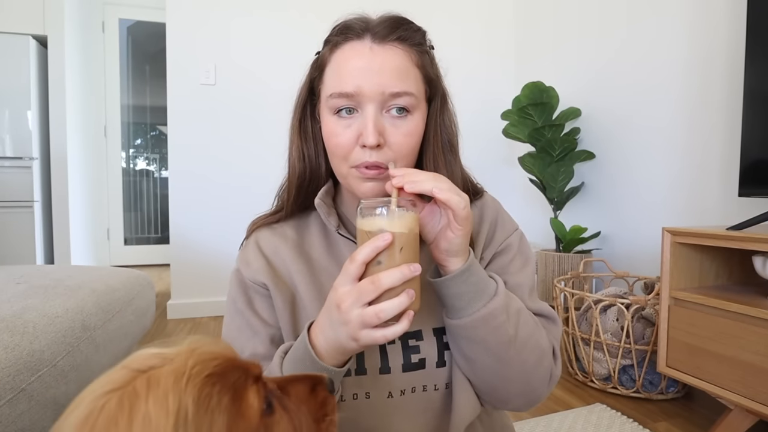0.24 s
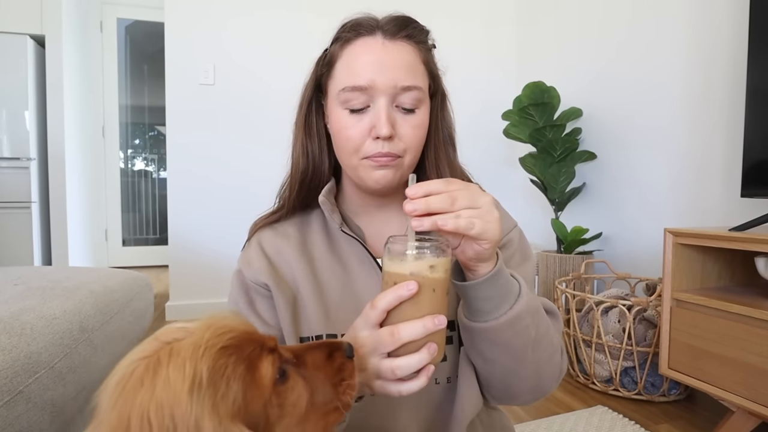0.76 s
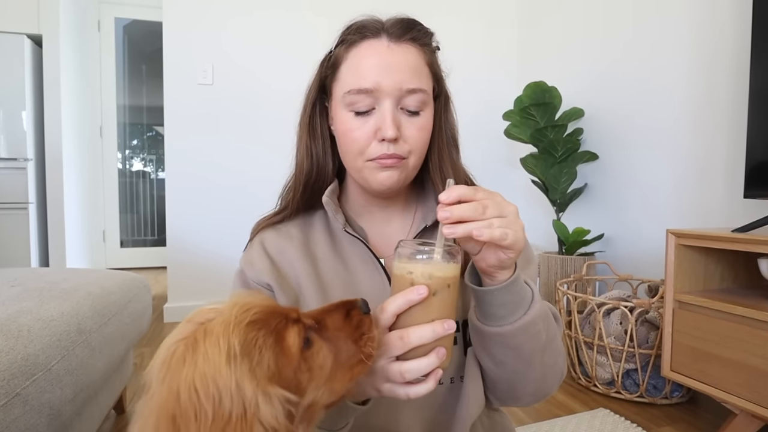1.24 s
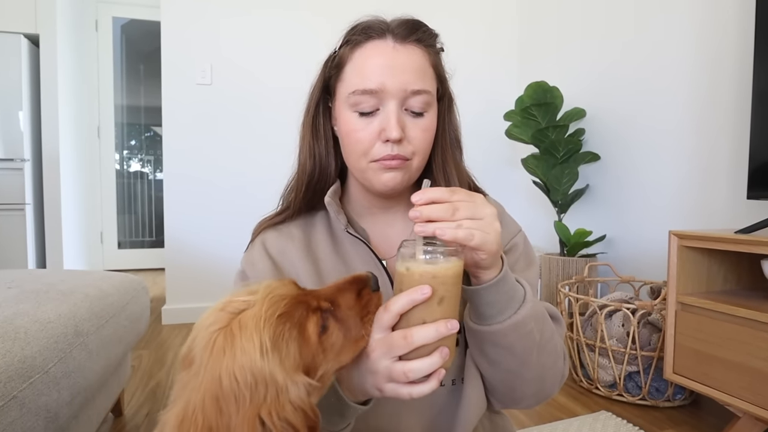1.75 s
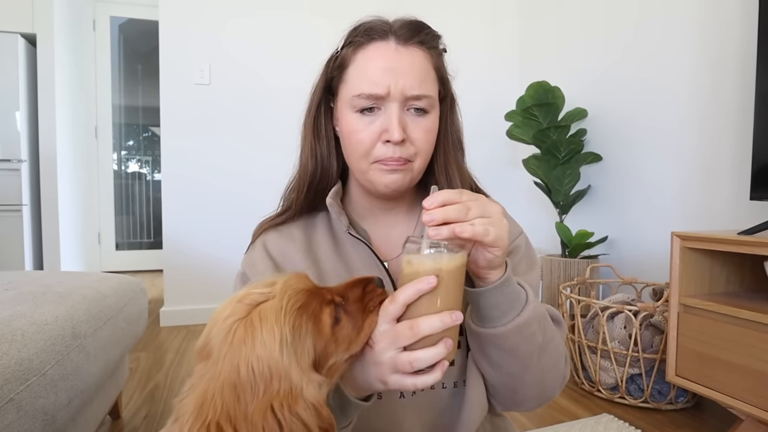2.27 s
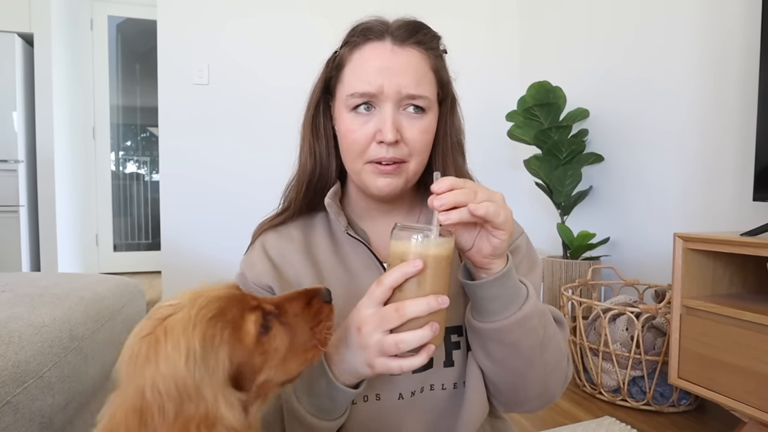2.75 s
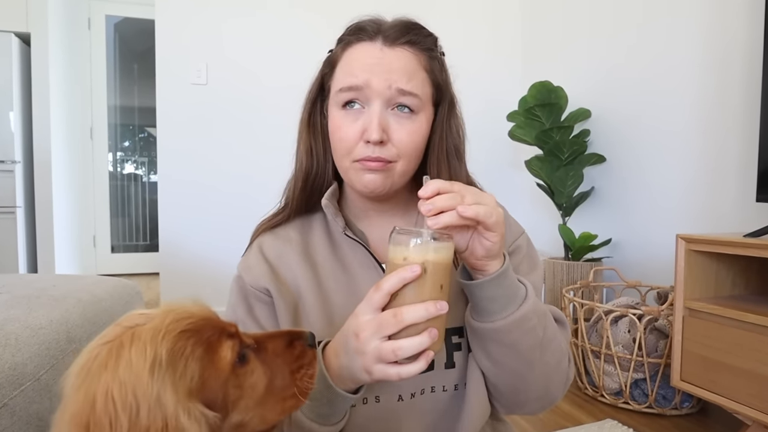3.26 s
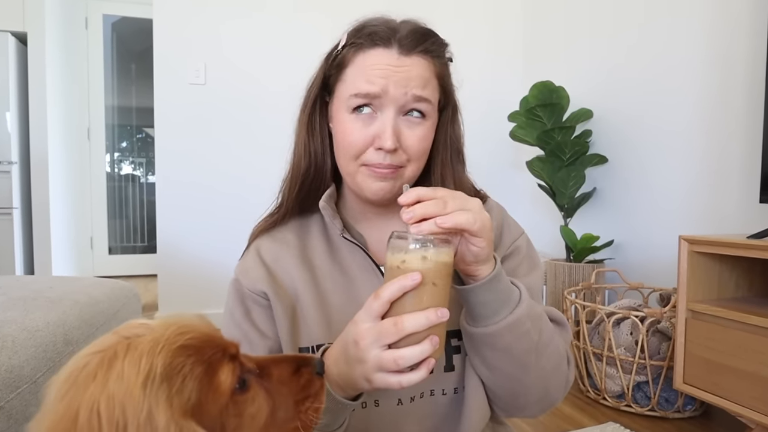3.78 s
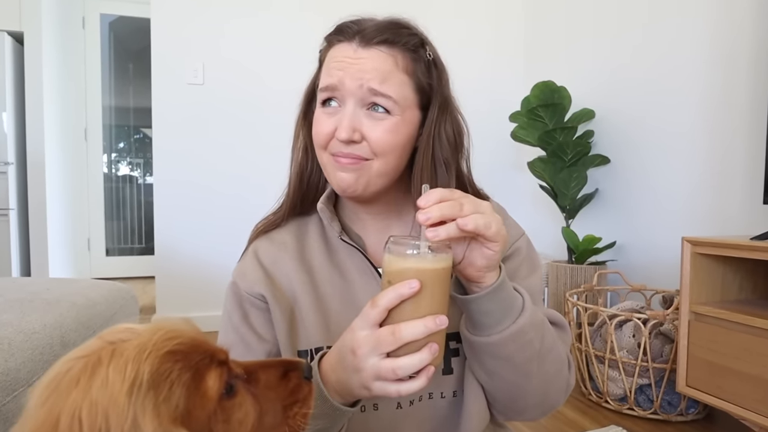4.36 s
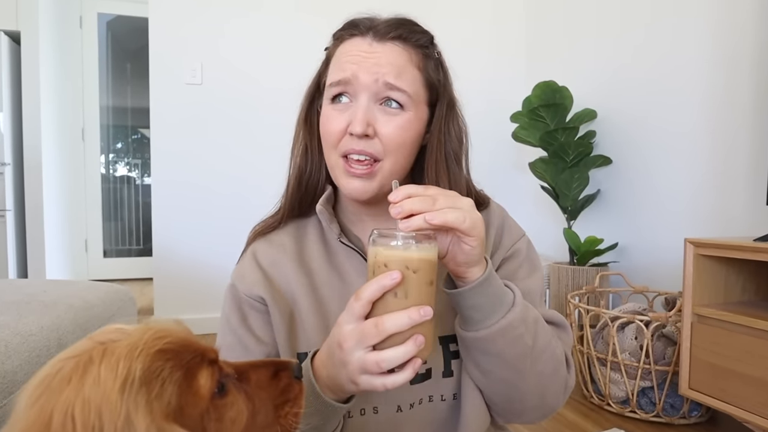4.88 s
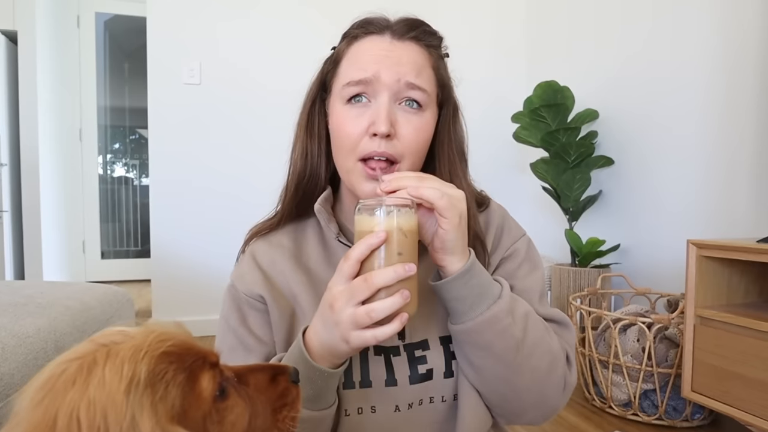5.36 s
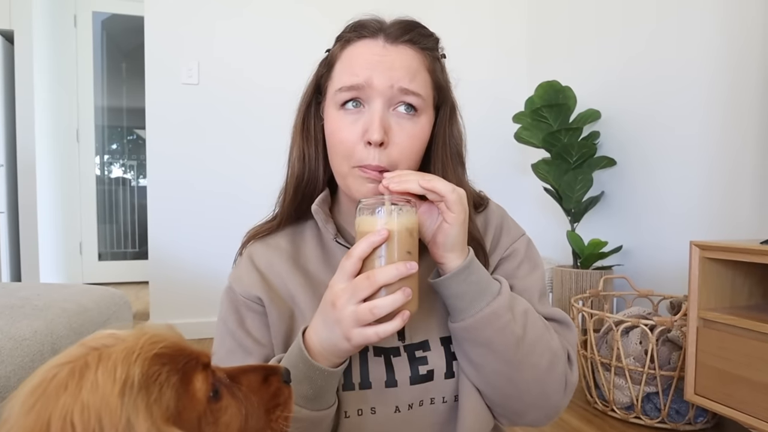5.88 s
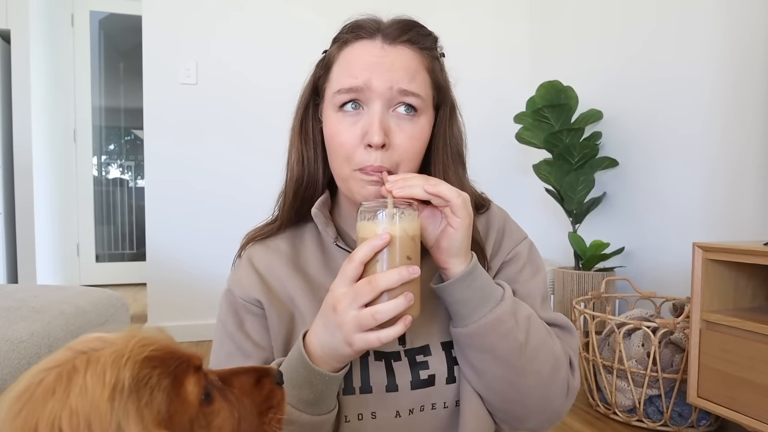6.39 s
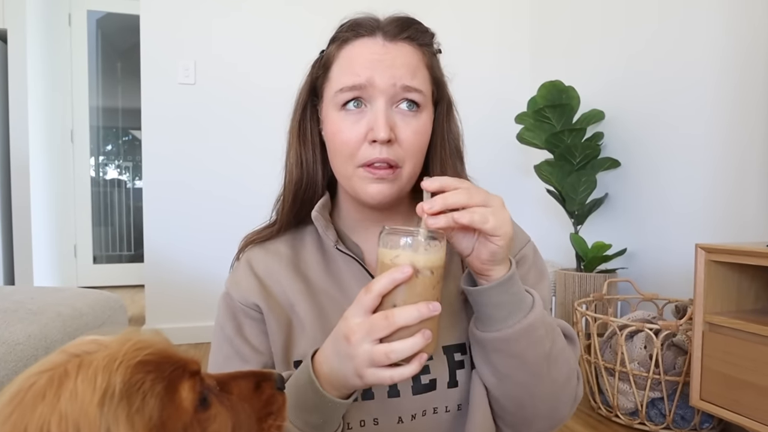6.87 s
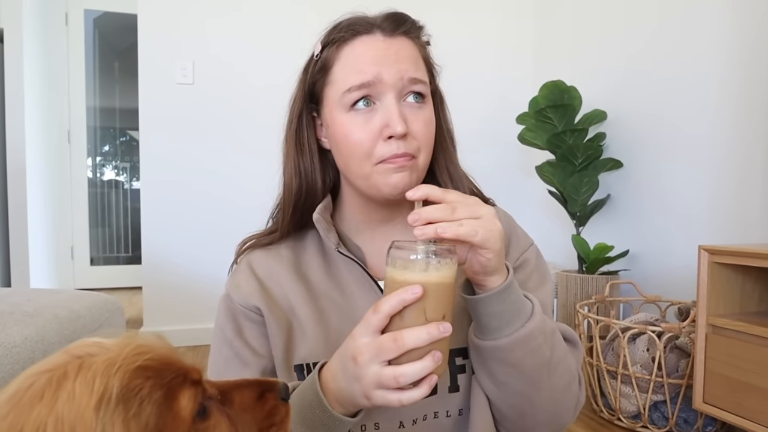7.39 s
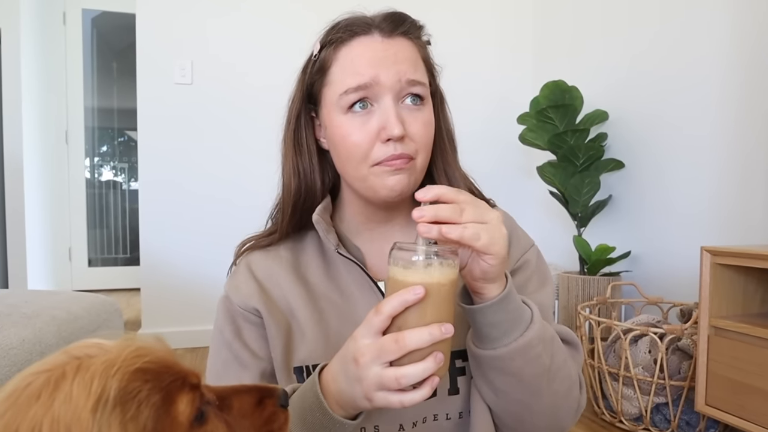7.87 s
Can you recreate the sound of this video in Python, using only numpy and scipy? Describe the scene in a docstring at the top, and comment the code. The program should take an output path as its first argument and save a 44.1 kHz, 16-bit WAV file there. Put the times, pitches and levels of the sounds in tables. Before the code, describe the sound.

A quiet living room with faint low rumble, soft hiss and a barely audible swelling hum. From about 0.3 s a straw begins nudging ice in a full glass held in the hand, close to a stereo microphone. Light clinks and hollow knocks thicken by 0.9 s, and a short cluster of low, rising liquid glugs sounds near 1.1 s. Stronger clacks stand out at 1.5 and 1.7 s. Stirring continues in uneven bursts from 2 to 4.9 s, with dense jostling, tiny ticks and sharper clinks near 3.4, 3.95 and 4.86 s. Then it thins to sparse, soft taps and is almost still around 6.1 to 6.6 s. Rattling resumes at about 6.8 s, with a clear bright clink at 7.3 s, eases, and grows again from 7.9 s to the end with duller knocks. Contacts die in milliseconds, leaving a short room tail.

```python
"""In a living room, a straw stirs ice cubes in a hand-held glass of iced coffee, with a pause for a sip.
The drink and the hand damp the glass, so each contact is a hollow knock, a short clink and a tick: brief
modal rings that open with a crack and die in milliseconds. Each push of the straw sets small ice jostling,
made of many slight contacts. A few glugs are rising sine rings; a noise tail in bands makes the room, and
filtered noise makes the faint rumble, hiss and hum."""
import sys
import numpy as np
from scipy import signal
from scipy.io import wavfile
from scipy.ndimage import uniform_filter1d

SR = 44100
rng = np.random.default_rng(int(sys.argv[2]) if len(sys.argv) > 2 else 0)


def int16_out(signal):
    """Quantize to a 16-bit WAV file."""
    q = np.round(np.clip(np.atleast_2d(signal).T, -1, 1) * 32767)
    wavfile.write(sys.argv[1], SR, q.astype(np.int16))


N = 358647


def from_db(db):
    """Decibels to gain."""
    return 10 ** (np.asarray(db) / 20)


def rms_one(x):
    """Scale to an rms of 1."""
    return x / np.sqrt(np.mean(x ** 2) + 1e-20)


def unit_level(wave):
    """Scale each contact's sound to an rms of 1, counted over 4 ms and averaged over the channels."""
    energy = np.mean(np.sum(wave ** 2, axis=2, keepdims=True), axis=1, keepdims=True)
    return wave / np.sqrt(energy / (0.004 * SR))


def at_time(rows, s):
    """Every column of a curve at the given times."""
    times, *columns = np.transpose(rows)
    return [np.interp(s, times, column) for column in columns]


def at_hz(rows, hz):
    """Every column of a spectrum at the given frequency, read on a log frequency axis."""
    points, *columns = np.transpose(rows)
    return [np.interp(np.log(hz), np.log(points), column) for column in columns]


def filtered(x, hz, kind, order=2):
    """Causal Butterworth filter."""
    sections = signal.butter(order, hz, kind, fs=SR, output="sos")
    return signal.sosfilt(sections, x + 1e-18)


def noise_bands(size):
    """Yields (centre Hz, mid noise, side noise) for bands about half an octave wide."""
    edges = np.geomspace(20, 17000, 22)
    white = rng.standard_normal((2, 2, size))
    for k, (low, high) in enumerate(zip(edges, edges[1:])):
        # neighbouring bands take turns between two independent noises
        mid, side = filtered(white[k % 2], [low, high], "band")
        yield np.sqrt(low * high), mid, side


def stereo(mid, side, alike):
    """Two noises mixed to a left and right of the given likeness."""
    alike = np.clip(alike, -1, 1)
    opposed = side * np.array([[1], [-1]])
    return np.sqrt((1 + alike) / 2) * mid + np.sqrt((1 - alike) / 2) * opposed


def swells(rows, s, attack_s, release_s):
    """Each row rises up to its start, holds for its length, then decays; one gain curve per dB column."""
    start, length, *levels_db = np.transpose(rows)
    since = s[:, None] - start
    attack = np.clip(1 + since / attack_s, 0, 1)
    release = np.exp(-np.maximum(since - length, 0) / release_s)
    return [np.max(attack * release * from_db(level_db), axis=1) for level_db in levels_db]


# spectrum of the house air: (frequency [Hz], relative density [dB])
AIR_SPECTRUM = [(20, -4.5), (30, -16), (45, -11.5), (65, -6), (120, -3.5), (220, -3.5), (380, -4),
                (600, -10.5), (900, -10.5), (1700, -17), (3500, -24.5), (5850, -31.5), (11500, -38.5),
                (15000, -66)]
# stereo width of the house air: (frequency [Hz], left-right likeness [-1 to 1])
AIR_LIKENESS = [(30, 0.68), (70, 1), (140, 0.35), (280, 0.042), (600, 0.028), (1500, 0.087), (4000, 0.05),
                (12000, 0.033)]
AIR_DB = -47.17


def house_air():
    """Steady rumble and hiss of the house: noise bands, nearly alike on both sides only in the bass."""
    air = 0
    for hz, mid, side in noise_bands(N):
        density_db, = at_hz(AIR_SPECTRUM, hz)
        alike, = at_hz(AIR_LIKENESS, hz)
        air = air + from_db(density_db) * stereo(mid, side, alike)
    return from_db(AIR_DB) * rms_one(air)


# swells of the low hum: (full level from [s], held for [s], level [dB])
HUM_SWELLS = [(.85, 0.46, -61.5), (1.72, 0.69, -56), (2.7, 0.33, -62.5), (6.87, 0.33, -57),
              (7.98, .15, -64)]
HUM_REST_DB, HUM_ATTACK_S, HUM_RELEASE_S = -69.5, 0.051, 0.12


def low_hum():
    """A narrow band of low noise that swells now and then above a resting level."""
    swell, = swells(HUM_SWELLS, np.arange(N) / SR, HUM_ATTACK_S, HUM_RELEASE_S)
    hum = rms_one(filtered(rng.standard_normal(N), [68, 77], "band"))
    return (from_db(HUM_REST_DB) + swell) * hum


# pushes of the straw, levels ahead of the jostling trims:
# (full level from [s], held for [s], knock level [dB], clink level [dB])
STROKES = [(0.33, 0.078, -39, -41.5), (0.52, 0.06, -47, -50), (0.62, 0.13, -37, -45),
           (0.77, 0.038, -40.5, -51), (0.95, 0.075, -36, -49.5), (1.18, 0.098, -35, -42),
           (1.38, 0.063, -49, -49.5), (1.54, 0.22, -39, -39.5), (1.78, 0.095, -36, -43),
           (1.99, 0.15, -36, -42), (2.29, .05, -42, -39), (2.35, 0.042, -28.5, -39),
           (2.49, 0.18, -47, -42.5), (2.70, 0.062, -58, -41.5), (2.94, 0.087, -37, -31.5),
           (3.04, 0.15, -47, -41.5), (3.30, 0.19, -38, -46), (3.65, 0.22, -36, -41),
           (3.93, 0.044, -34, -41), (4.19, 0.08, -34, -44.5), (4.33, 0.11, -43.5, -46.5),
           (4.51, 0.38, -34, -36), (4.97, 0.097, -45.5, -44), (5.70, 0.074, -56, -57),
           (6.40, 0.065, -49, -53), (6.93, 0.27, -40, -48), (7.20, 0.05, -30.5, -31.5),
           (7.35, 0.052, -39.5, -42), (7.45, 0.24, -40.5, -43.5), (7.66, 0.11, -53, -47),
           (7.99, 0.18, -32.5, -35)]
# slow drift of the ice, which keeps on between strokes and nearly rests during the sip,
# ahead of the same trims: (time [s], knock level [dB])
DRIFT = [(0, -48.5), (.2, -81), (.6, -53), (1.1, -45), (4.9, -47.5), (5.4, -56.5), (5.95, -60), (6.3, -79),
         (6.65, -68), (7.3, -63), (8.13, -38.5)]
STROKE_ATTACK_S, STROKE_RELEASE_S = 0.035, 0.019  # the ice gathers speed; the drink brakes it
DRIFT_CLINK_DB = -4.5  # drift clinks against drift knocks


def briskness(s):
    """Knock and clink level of the small ice in dB: the strokes on top of the slow drift."""
    knock, clink = swells(STROKES, s, STROKE_ATTACK_S, STROKE_RELEASE_S)
    drift_db, = at_time(DRIFT, s)
    knock = np.hypot(knock, from_db(drift_db))
    clink = np.hypot(clink, from_db(drift_db + DRIFT_CLINK_DB))
    return 20 * np.log10([knock, clink])


def ringing(modes, own_hz, own_db, own_t60, size_law, reach, detune, spread, rise_s):
    """Short rings (contacts, 2, samples): the shared modes plus one pitch that belongs to the spot struck."""
    t = np.arange(SR // 70) / SR
    hz, mode_db, t60 = np.transpose(modes)
    chance = rng.standard_normal((len(own_hz), 4, len(hz) + 1))
    # modes within reach (octaves) of the spot's own pitch are driven hardest
    distance = np.log2(hz / own_hz[:, None]) / reach
    gain = from_db(mode_db + 2.0 * chance[:, 0, 1:]) / (1 + distance ** 2)
    gain = gain * np.sign(chance[:, 1, 1:]) / np.linalg.norm(gain, axis=1, keepdims=True)
    # each mode radiates its own way and meets the two microphones out of step (spread in radians)
    turn = np.exp(1j * spread * chance[:, 2, None, :] * np.array([[1], [-1]]))
    partials = np.exp(2j * np.pi * hz[:, None] * t) * from_db(-60 * t / t60[:, None])
    shared = (gain[:, None] * turn[:, :, 1:]) @ partials
    # no two cubes are the same size, so the modes shift from contact to contact
    shared = shared * np.exp(2j * np.pi * detune * hz.mean() * chance[:, 3, :1, None] * t)
    # bigger cubes sound lower and ring longer
    own_t60 = own_t60 * (hz.mean() / own_hz[:, None]) ** size_law
    own = 1j * from_db(own_db - 60 * t / own_t60) * np.exp(2j * np.pi * own_hz[:, None] * t)
    ring = (shared + turn[:, :, :1] * own[:, None]).imag
    return unit_level(ring * (1 - np.exp(-t / rise_s)))


def struck(ring, level_db, own_hz, crack_hz, width_hz, crack_db, room_ring_db):
    """Opens a ring with a broad, pitchless crack; the ring beams forward, so the room hears another mix."""
    t = np.arange(ring.shape[-1]) / SR
    centre_hz = np.sqrt(own_hz * crack_hz)[:, None, None]
    burst = t ** 2 * np.exp(-2 * np.pi * width_hz * t)
    crack = unit_level(burst * np.cos(2 * np.pi * centre_hz * t))
    direct = unit_level(ring + from_db(crack_db) * crack)
    sent = unit_level(crack + from_db(room_ring_db) * ring)
    # (contacts, direct or sent, 2, samples)
    return np.stack([direct, sent], axis=1) * from_db(level_db)[:, None, None, None]


# modes of the full glass: (frequency [Hz], relative level [dB], t60 [s])
GLASS_MODES = [(670, -5.5, 0.013), (802, -1.5, 0.02), (940, -3, 0.02), (1285, -3.5, 0.015),
               (1512, 4, 0.012), (1670, 5.5, 0.0083)]


def glass_knock(level_db, hz):
    """Hollow knock: the low modes of the full glass, damped by the drink and the hand."""
    ring = ringing(GLASS_MODES, hz, own_db=0.5, own_t60=0.012, size_law=0.89, reach=0.86,
                   detune=0.067, spread=0.22, rise_s=0.00088)
    return struck(ring, level_db + 0.099, hz, crack_hz=1330, width_hz=760, crack_db=-15.5, room_ring_db=0.5)


# modes of the hard ice: (frequency [Hz], relative level [dB], t60 [s])
ICE_MODES = [(2558, 3, 0.018), (2860, 4.5, 0.012), (3430, 5, 0.013), (3820, 9, 0.0055), (4410, 4, 0.0075),
             (5247, 6, 0.012), (5750, 2, 0.0053), (6900, 5, 0.0046)]


def ice_clink(level_db, hz, pure_db):
    """Short clink: the hard ice rings; the purer its own pitch, the weaker the crack that opens it."""
    ring = ringing(ICE_MODES, hz, own_db=pure_db[:, None] - 0.5, own_t60=0.0061, size_law=1.2, reach=0.79,
                   detune=0.058, spread=0.49, rise_s=0.00021)
    crack_db = -11.0 - 0.77 * pure_db[:, None, None]
    return struck(ring, level_db - 0.4, hz, crack_hz=3490, width_hz=1700, crack_db=crack_db, room_ring_db=-5.5)


# modes of the contact point: (frequency [Hz], relative level [dB], t60 [s])
TICK_MODES = [(5860, 8, 0.005), (7440, 4.5, 0.0035), (8470, 1, 0.003), (8940, -2, 0.0035),
              (10200, 2, 0.0025), (10950, -5, 0.003), (12230, 0.5, 0.0035)]


def contact_tick(level_db, hz):
    """Bright tick: the contact point rings highest and dies first."""
    ring = ringing(TICK_MODES, hz, own_db=-4.0, own_t60=0.0038, size_law=0.9, reach=1.0,
                   detune=0.035, spread=0.81, rise_s=0.0001)
    return struck(ring, level_db - 2.5, hz, crack_hz=9000, width_hz=2700, crack_db=-11.0, room_ring_db=8.0)


def chattering(waves, s, graze_s, rebound_s, graze_db, rebound_db):
    """Wet ice lands unevenly: a light graze, the main touch at time s, and a rebound up to 2 ms later."""
    gaps = rng.uniform(0.4, 1.6, (len(s), 3)) * np.array([-graze_s, 0, rebound_s])
    starts = np.clip((s[:, None] + gaps) * SR, 0, N - 1).astype(int)
    gains = from_db([graze_db, 0, rebound_db])
    size = waves.shape[-1]
    out = np.zeros((2, 2, N + size))
    for wave, touches in zip(waves, starts):
        for start, gain in zip(touches, gains):
            out[..., start:start + size] += gain * wave
    return out[..., :N]


GLASS_PAN_DB, PAN_SCATTER_DB = -1.5, 1.1  # left minus right; each spot radiates a little differently


def contacts(rows):
    """Knock, clink and tick of each contact with the glass; gives (direct sound, sound sent to the room)."""
    s, knock_db, knock_hz, clink_db, clink_hz, pure_db, tick_db, tick_hz = np.transpose(rows)
    knock = glass_knock(knock_db, knock_hz)
    bright = ice_clink(clink_db, clink_hz, pure_db) + contact_tick(tick_db, tick_hz)
    # the loudest and purest clinks are those that beam straight at the microphones: the room gets less
    beaming_db = 0.076 * np.maximum(clink_db + 43.0, 0) + 0.098 * (pure_db + 13.5)
    waves = knock + bright * from_db(-np.outer(beaming_db, [0, 1]))[:, :, None, None]
    pan_db = GLASS_PAN_DB + PAN_SCATTER_DB * rng.standard_normal(len(s))
    waves[:, 0] *= from_db(pan_db[:, None, None] * np.array([[0.5], [-0.5]]))
    return chattering(waves, s, graze_s=0.0005, rebound_s=0.0012, graze_db=-20.5, rebound_db=-11.5)


def jostling(per_s, uneven_db, knock_gain_db, clink_gain_db, tick_gain_db, catch_share, catch_db):
    """Many slight contacts at random moments, as strong as the stirring is brisk; a few catch and click."""
    count = int(per_s * N / SR)
    chance = rng.random((count, 8))
    s = (np.arange(count) + 1.5 * chance[:, 0]) / per_s
    knock_db, clink_db = briskness(s)
    force_db, hard_db, sharp_db = uneven_db * (2 * chance[:, 1:4].T - 1)
    # a catch on an edge lifts the clink most
    edge_db = catch_db * np.exp(-chance[:, 6] / catch_share)
    knock_db = knock_db + force_db + 0.2 * edge_db + knock_gain_db
    clink_db = clink_db + force_db + 0.5 * hard_db + edge_db + clink_gain_db
    tick_db = clink_db + 1.5 * sharp_db + tick_gain_db
    knock_hz = 700 + 1200 * chance[:, 4]
    clink_hz = 2300 + 2500 * chance[:, 5] ** 2.06
    tick_hz = 6000 + 5000 * chance[:, 7]
    pure_db = np.full(count, -2.5)
    return contacts(np.transpose([s, knock_db, knock_hz, clink_db, clink_hz, pure_db, tick_db, tick_hz]))


# tail of the living room:
# (frequency [Hz], relative tail level [dB], t60 [s], left-right likeness [-1 to 1])
ROOM = [(300, 1, 0.78, 0.14), (590, -6, 0.14, 0.0025), (910, -1.5, 0.65, 0.58), (1535, -1, 0.54, 0.41),
        (2150, 1.5, 0.5, 0.17), (3400, -1.5, 0.5, 0), (4930, -7, 0.37, 0), (7000, -2, 0.54, 0),
        (11900, -3.5, 0.14, 0), (16000, 3, 0.15, 0)]


def living_room(x, first_s, build_s, pan_db, grain_db, grain_s, near_s, near_db):
    """One near surface reflects on its own; other reflections blend into a tail that dies band by band."""
    t = np.arange(round(0.8 * SR)) / SR
    # the early tail is grainy, then smooths out
    grain = rms_one(uniform_filter1d(rng.standard_normal(len(t)), size=45))
    build = 1 - np.exp(-np.maximum(t - first_s, 0) / build_s)
    onset = build * from_db(grain_db * grain * np.exp(-t / grain_s))
    response = 0
    for hz, mid, side in noise_bands(len(t)):
        wet_db, t60, alike = at_hz(ROOM, hz)
        fade = onset * from_db(-60 * t / t60)
        fade = fade / np.linalg.norm(fade)
        response = response + from_db(wet_db) * fade * stereo(mid, side, alike)
    response[:, int(near_s * SR)] += from_db(near_db)
    # pan_db lifts the left and lowers the right
    return signal.fftconvolve(x, response, axes=1)[:, :N] * from_db([[pan_db], [-pan_db]])


# cubes and the straw that hit the glass hard enough to stand out, and at 5.477 s a click of the lips at the
# sip, levels ahead of each layer's trim: (time [s], knock level [dB], knock pitch [Hz], clink level [dB], clink
# pitch [Hz], clink's own pitch over the shared modes [dB], tick level [dB], tick pitch [Hz])
KNOCKS = [(0.3562, -42, 1660, -44, 4600, -3, -51, 11200), (0.4054, -44, 1580, -41, 5000, -7, -44, 5800),
          (0.4457, -37.5, 1720, -36, 4230, 1, -46, 7060), (0.6237, -42, 1380, -33, 2280, -6, -45, 12000),
          (0.6321, -37, 1400, -44, 3400, -3, -41, 7000), (0.6485, -36, 1130, -39, 2330, -2, -42, 6700),
          (0.7057, -36, 1310, -39, 3400, 9, -52, 7100), (0.7175, -44, 1510, -36, 2270, 7, -46, 7000),
          (0.7712, -43, 1360, -37, 2550, -11, -64, 5800), (0.7809, -34, 1430, -36.5, 2400, -6, -48, 6800),
          (0.803, -34, 960, -41, 2630, 0, -55, 5800), (0.8096, -38, 1480, -38, 3840, -3, -41, 7500),
          (0.9395, -38.5, 1220, -41, 2990, 8, -66, 5900), (0.9563, -33, 1450, -32, 2550, 5, -52, 5900),
          (0.9687, -30.5, 1390, -29.5, 3400, 10, -47, 6500), (0.987, -43, 1540, -42, 3420, 4, -58, 6400),
          (1.0237, -33, 810, -35, 2250, -9, -59, 5900), (1.0726, -39, 1370, -30.5, 4000, -10, -56, 5500),
          (1.1064, -38, 1440, -51, 3490, 8, -62, 7100), (1.1222, -34, 710, -41, 3440, 10, -62, 6000),
          (1.1752, -31.5, 1580, -34.5, 4870, -8, -36, 5650), (1.1824, -26, 1290, -27, 3300, 2, -45, 5760),
          (1.1987, -30, 1340, -33.5, 3270, -12, -45, 5700),
          (1.2362, -29.5, 1260, -34.5, 2880, -3, -42.5, 7400), (1.3874, -37, 1260, -42, 2480, 0, -54, 8300),
          (1.3942, -39, 1340, -37.5, 2630, -1, -53, 5900), (1.4015, -31, 1430, -30, 2780, 4, -52, 11900),
          (1.4161, -32, 1460, -30, 3520, 7, -42, 6040), (1.4535, -43, 1400, -46, 4200, -4, -51, 9500),
          (1.4668, -29, 1280, -35, 3500, 0, -63, 6000), (1.5012, -31, 1430, -34, 3630, 6, -51, 5870),
          (1.5159, -16.5, 1670, -18, 4850, -9, -16, 9200), (1.5275, -24, 1850, -34, 2080, 4, -50, 5800),
          (1.5598, -37, 1640, -30, 5120, -12, -33, 11500), (1.7222, -28, 1020, -15, 2600, 8, -12.5, 5900),
          (1.732, -31, 1670, -25, 2630, 2, -21, 5670), (1.8077, -27, 1490, -43, 2230, -14, -44, 11500),
          (1.9576, -28.5, 1500, -24.5, 4870, 8, -35, 7450), (1.985, -36, 1530, -35, 3230, -3, -41, 7400),
          (1.9883, -26.5, 1510, -34, 3080, -1, -44, 5510), (2.0075, -33, 1540, -52, 2360, -9, -59, 7700),
          (2.066, -33, 1150, -35, 2970, 3, -50, 5600), (2.0803, -31, 1580, -27, 4370, -14, -30, 7500),
          (2.0848, -39, 1530, -26, 2470, 0, -44, 7800), (2.0896, -36, 1440, -29, 4930, -7, -37, 5510),
          (2.1056, -28.5, 1380, -25.5, 5100, 1, -31, 5900),
          (2.1186, -45, 1520, -29.5, 3820, -6, -41, 11600), (2.2386, -30.5, 1390, -41, 2260, 2, -63, 7700),
          (2.2884, -48, 1450, -34.5, 3400, 7, -56, 5800), (2.2938, -32, 1210, -38, 2810, 0, -48, 5900),
          (2.3208, -36, 1530, -43, 2890, 0, -53, 5700), (2.3504, -32, 1620, -28.5, 2380, 5, -34, 6170),
          (2.3521, -29, 1590, -30, 2950, 0, -40, 5510), (2.3604, -27.5, 1370, -34, 2360, -8, -60, 6000),
          (2.3795, -29, 1300, -25, 4950, 12, -34, 5700), (2.3831, -29, 1320, -29, 2730, 3, -47, 10640),
          (2.4092, -27, 1390, -27, 4850, -1, -34, 5870), (2.4528, -44, 1510, -38, 4500, -6, -45, 7500),
          (2.4707, -31, 1700, -22, 4840, -2, -28, 5600), (2.4987, -28.5, 1460, -34, 2400, 2, -54, 7200),
          (2.5307, -41, 1490, -35, 3470, 9, -56, 5900), (2.5825, -42, 1650, -35.5, 3200, 1, -63, 5800),
          (2.5911, -26, 1560, -44, 2170, -9, -45, 5900), (2.6336, -35, 1600, -34, 2400, -3, -48.5, 10600),
          (2.7047, -41, 1770, -34.5, 3450, 9, -41, 6400), (2.7184, -31, 1730, -58, 2280, 4, -40, 6600),
          (2.7234, -45, 1620, -43, 4500, -2, -40, 6900), (2.7758, -34.5, 1620, -30.5, 5300, 0, -38.5, 5740),
          (2.87, -38, 1420, -36, 2460, 5, -58, 5900), (2.935, -25.5, 1480, -21.5, 4070, -8, -34, 10500),
          (2.9464, -26.5, 1710, -22, 2860, -6, -42, 5800), (2.9595, -24.5, 1480, -31, 2950, 7, -55, 5800),
          (2.9989, -27, 920, -25, 3450, 11, -44, 11800), (3.0563, -31, 1280, -34, 2820, 9, -54, 5600),
          (3.0853, -18, 1640, -28, 2260, -5, -45, 5900), (3.1063, -27, 1630, -34, 2190, -5, -63, 5800),
          (3.1196, -35, 1430, -32.5, 3200, 16, -57, 5770), (3.1865, -33.5, 1660, -36, 2280, -3, -72, 11300),
          (3.2903, -32.5, 910, -34, 4040, -4, -53, 5800), (3.3123, -33, 1570, -43, 2220, -9, -43, 6500),
          (3.347, -33, 1830, -33, 3320, 7, -41, 7900), (3.3826, -38, 1070, -40, 3100, -4, -56, 6000),
          (3.3951, -24, 1616, -21, 3260, 0, -25.5, 6060), (3.4201, -23.5, 1040, -31, 5100, -6, -32, 6040),
          (3.4254, -26, 1480, -34, 4800, -2, -30, 6720), (3.4287, -23.5, 1590, -22.5, 4800, 3, -25, 6740),
          (3.5581, -53, 1120, -63, 2310, -7, -37.5, 9900), (3.596, -48, 1480, -37.5, 3560, 3, -63, 5800),
          (3.6124, -42, 1570, -39.5, 5000, 0, -47, 5600), (3.6469, -27.5, 1560, -27.5, 2780, -1, -31, 7800),
          (3.6632, -47, 1550, -35, 3880, -1, -52, 5900), (3.68, -31.5, 950, -29.5, 4570, 12, -42, 5900),
          (3.6952, -33, 1200, -32, 3520, -2, -52, 6000), (3.7341, -29.5, 1620, -40, 2210, -6, -53, 8900),
          (3.785, -29.5, 1300, -31.5, 2760, 1, -49, 5800),
          (3.8072, -29.5, 1480, -29.5, 3150, -2, -37.5, 10000),
          (3.8549, -31, 1500, -34, 2240, -12, -55, 5800), (3.9118, -30, 1220, -36, 3300, 4, -50, 9600),
          (3.9507, -31, 1730, -28.5, 2620, -9, -41, 5900),
          (3.9578, -21.5, 1600, -14, 3970, -13, -19.5, 7660),
          (3.984, -29, 1640, -29, 3530, -6, -28.5, 7600), (4.0142, -26, 1620, -29.5, 3520, -4, -47, 5900),
          (4.0521, -32.5, 1500, -27, 3640, 0, -30.5, 5800), (4.1665, -37, 1280, -36, 2280, -1, -45, 5900),
          (4.2208, -34.5, 1640, -31, 3260, 0, -44.5, 6740), (4.3129, -38.5, 820, -42, 2520, 2, -58, 7500),
          (4.3651, -34.5, 1510, -32, 4660, 0, -48, 5800), (4.3836, -29.5, 926, -26.5, 4740, 9, -39, 5700),
          (4.3862, -33, 1020, -29, 4740, 1, -43, 5700), (4.4956, -26.5, 1320, -29.5, 2730, -1, -38, 7000),
          (4.5036, -34, 1130, -32, 3570, 3, -34, 5800), (4.5213, -28, 850, -25.5, 3140, -5, -50, 5700),
          (4.5363, -28.5, 1480, -33, 2930, 2, -51, 5800), (4.5455, -36, 1570, -41, 3680, -3, -51, 5840),
          (4.5793, -48, 950, -47, 3060, 0.5, -46, 5900),
          (4.6054, -30.5, 1560, -26.5, 3060, -1, -36.5, 6050),
          (4.6209, -28, 1310, -29.5, 2600, -8, -61, 9900), (4.6463, -42, 1460, -34, 3220, 6, -56, 5800),
          (4.65, -27, 1250, -30, 2600, 5, -41, 8300), (4.6622, -35, 1570, -36, 3240, 6.5, -45, 11000),
          (4.6688, -29.5, 1390, -27.5, 3370, 7, -45, 5900), (4.6806, -38, 1690, -29, 2000, -11, -49, 5600),
          (4.6933, -33, 1140, -32, 3300, 9, -52, 6900), (4.7412, -28.5, 1480, -44, 2290, -5, -64, 5800),
          (4.7597, -42, 1430, -28, 3420, 2, -51, 6000), (4.767, -40, 1480, -28, 2550, 22, -44, 6900),
          (4.7816, -23.5, 1400, -26, 3870, 4, -26.5, 6600), (4.8024, -47, 1320, -37, 4400, -1, -29.5, 6370),
          (4.8339, -43, 990, -34, 3100, 5, -33, 5800), (4.8387, -44, 1400, -39, 2820, -3, -42, 6400),
          (4.858, -23, 1230, -11.5, 4790, 1.5, -20.5, 5740), (5.1974, -45, 1740, -36.5, 3350, 2, -45, 5660),
          (5.2503, -33.5, 1640, -38.5, 2230, -3, -59, 5800), (5.2587, -37, 1560, -47, 2000, -5, -69, 10010),
          (5.3256, -45, 1420, -44.5, 3490, 12, -50, 6100),
          (5.477, -32.5, 1000, -25.5, 3050, -6, -34.5, 5440),
          (5.4932, -27.5, 1010, -32.5, 2240, 4, -61, 6000), (5.6024, -38.5, 1800, -43, 2150, -9, -63, 6000),
          (5.6194, -42, 1000, -43, 2920, 10, -63, 5800), (5.689, -29.5, 975, -43, 2400, -4, -58, 6600),
          (5.706, -41, 1060, -41, 3550, -4, -44.5, 7540), (5.7288, -40, 1010, -50, 2170, -3, -64, 10100),
          (5.7849, -38, 1820, -41, 2980, 5, -55, 6000), (5.8792, -44.5, 1140, -38, 3450, 23, -66, 7700),
          (5.9528, -40.5, 1750, -43, 2730, 1, -74, 9200), (6.0526, -38, 1220, -39.5, 3700, 16, -54, 7440),
          (6.0996, -40, 1160, -55, 2230, -1, -70, 7500), (6.579, -41, 880, -50.5, 4250, 8, -68, 9200),
          (6.6859, -43.5, 1240, -43, 3220, -7, -51, 11000), (6.7243, -42, 1230, -41, 2540, -6, -53, 6100),
          (6.7708, -38, 1730, -33.5, 4880, 2, -33, 7150), (6.7797, -41, 1670, -37.5, 3180, 4, -51, 5600),
          (6.7877, -32.5, 1540, -50, 2200, -6, -58, 6300), (6.8611, -27.5, 890, -24.5, 4600, 7, -37, 5900),
          (6.8638, -31, 1140, -28, 4730, 9, -43, 5700), (6.9274, -36, 840, -53, 2260, -11, -67, 5800),
          (6.9839, -29.5, 1570, -32.5, 3500, 4, -44, 5800), (7.015, -38, 1670, -47, 2000, 4, -41, 7670),
          (7.0169, -31.5, 850, -36, 2160, -5, -36.5, 7800), (7.071, -29.5, 870, -32.5, 4550, 6, -58, 5700),
          (7.1393, -36, 1400, -33, 3240, 6, -43, 6600), (7.1544, -36, 1600, -32.5, 3450, 3, -36, 6450),
          (7.1906, -34, 1310, -37, 2580, 2, -53, 6800), (7.1973, -29, 940, -31, 4730, -7, -44, 5800),
          (7.2107, -32, 1390, -36, 3380, 1, -48, 5900), (7.2165, -30, 1560, -32, 2970, -1, -38, 7100),
          (7.2256, -27, 1150, -31, 3380, 4, -49, 5800), (7.239, -29, 1270, -34, 2770, 2, -49, 8900),
          (7.2533, -38, 1280, -30.5, 3500, 0, -52, 6400), (7.2787, -31, 840, -23, 2440, 7, -30, 5930),
          (7.2851, -30, 1580, -23, 5140, -18, -39, 6400), (7.2902, -20, 1460, -11, 3800, 20, -16, 7100),
          (7.39, -33, 1660, -37, 3070, 9, -57, 6200), (7.4555, -44, 1140, -35, 3100, 7, -61, 7800),
          (7.4687, -34, 1470, -38, 3720, -1, -56, 6000), (7.4845, -37, 1440, -41, 3210, 1, -60, 6000),
          (7.5327, -37, 1550, -56, 2180, -2, -62, 6600), (7.5584, -30, 1490, -32.5, 3200, 17, -52, 12000),
          (7.5727, -31, 1560, -57, 2170, -9, -63, 6500), (7.5803, -40, 1290, -36, 2260, -7, -42.5, 6260),
          (7.6756, -36, 1570, -41, 2190, -5, -55, 5900), (7.6936, -39, 1590, -37, 3080, -3, -51, 5760),
          (7.7548, -36.5, 1570, -55, 2230, -9, -62, 10200), (7.8041, -34, 1560, -56, 2210, -7, -51, 7960),
          (7.8888, -38, 1510, -44, 4900, 11, -48, 5900), (7.932, -31, 950, -36.5, 3500, 0, -47, 5600),
          (7.9378, -26, 830, -32.5, 2920, -9, -46, 7740), (7.9528, -27, 860, -31.5, 2890, -2, -58, 5800),
          (7.9827, -21, 1260, -29, 2200, -7, -31.5, 11000),
          (7.9841, -29, 1250, -27.5, 2000, -9, -39, 11090), (8.0009, -34, 1650, -27, 3600, -9, -41, 6900),
          (8.0054, -24.5, 1590, -32, 2670, -4, -46, 6600), (8.0447, -26, 1430, -24.5, 3060, -13, -37, 5840),
          (8.0491, -30, 1410, -44, 2000, -9, -57, 11970), (8.0698, -37, 1230, -43, 3900, 0, -54, 5600),
          (8.1138, -25.5, 860, -31.5, 2770, -5, -51, 5800),
          (8.1189, -26, 930, -26.5, 2450, -4, -35.5, 6550)]


def stand_out_hits():
    """The stand-out hits of the cubes and the straw on the glass, and one click of the lips, each placed and
    tuned by hand."""
    return contacts(KNOCKS)


# pockets of air in the drink: (time [s], starting level [dB], starting pitch [Hz])
GLUGS = [(1.050, -34, 207), (1.054, -27, 390), (1.081, -19, 420), (1.088, -24, 636), (1.095, -31.5, 190),
         (1.106, -27, 497), (1.121, -29, 600)]
GLUG_ATTACK_S = 0.004  # a pocket of air takes a moment to pinch off
GLUG_CYCLES = 10  # cycles of the starting pitch until 60 dB down; the ice and foam damp the ring
GLUG_RISE_PER_S = 3.3  # rise of pitch as a share of the starting pitch


def glugs():
    """Pockets of air swell and ring in the drink, rising in pitch as they near the surface."""
    t = np.arange(SR // 10) / SR
    out = np.zeros(N)
    for s, level_db, hz in GLUGS:
        start = int(s * SR)
        decay = from_db(level_db - 60 * t * hz / GLUG_CYCLES)
        cycles = hz * t * (1 + GLUG_RISE_PER_S * t / 2)
        out[start:start + len(t)] += (1 - np.exp(-t / GLUG_ATTACK_S)) * decay * np.sin(2 * np.pi * cycles)
    return np.array([out, out])


# colour of the microphone pair for sound from the glass:
# (frequency [Hz], width [Hz], left level [dB], right level [dB])
MICROPHONES = [(2390, 3000, -2.5, 1), (4860, 660, 1.5, 1), (8100, 10000, 1, 0.5), (11100, 1600, 4, 0)]


def microphones(x):
    """Resonant peaks and dips in series that differ between left and right."""
    for hz, width, *level_db in MICROPHONES:
        band = signal.lfilter(*signal.iirpeak(hz, hz / width, fs=SR), x)
        x = x + (from_db(level_db)[:, None] - 1) * band
    return x


def scene():
    """The glass close by, the room around it; so small a source gives off little bass."""
    stirring = jostling(per_s=150, uneven_db=6.0, knock_gain_db=-5.5, clink_gain_db=-7.5,
                        tick_gain_db=-19.5, catch_share=0.18, catch_db=8.5)
    ice = filtered(stand_out_hits() + stirring, 510, "high")
    direct, sent = ice + glugs()
    room = living_room(sent, first_s=0.0002, build_s=0.000094, pan_db=0.5, grain_db=4.5,
                       grain_s=0.03, near_s=0.0043, near_db=-24.5)
    return microphones(direct + room) + house_air() + low_hum()


def record(dry):
    """Clips anything beyond full scale, then cuts the top steeply above 15 kHz."""
    return filtered(np.clip(dry, -1, 1), 15000, "low", order=12)


dry = scene()
out = record(dry)
int16_out(out)
```